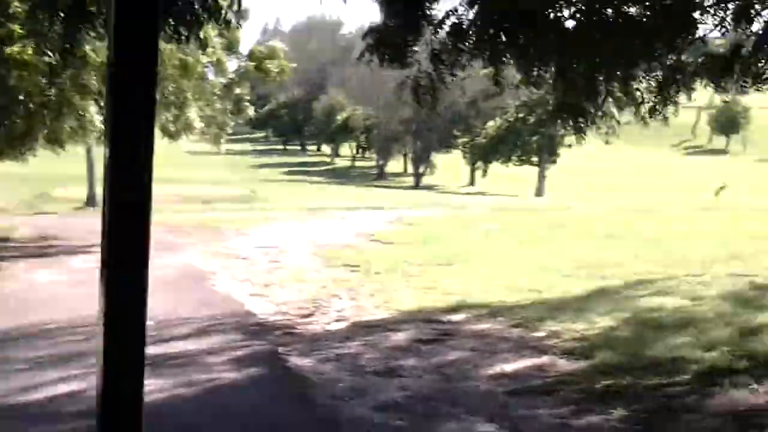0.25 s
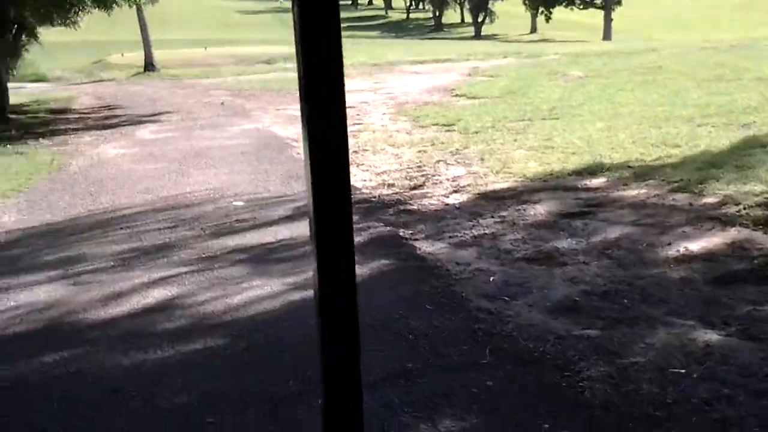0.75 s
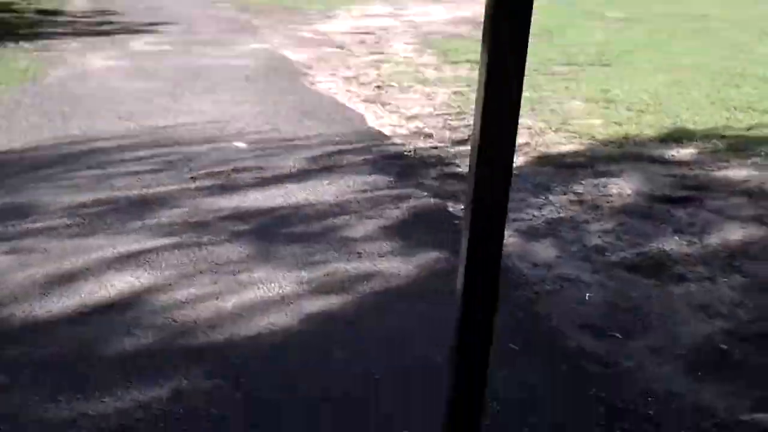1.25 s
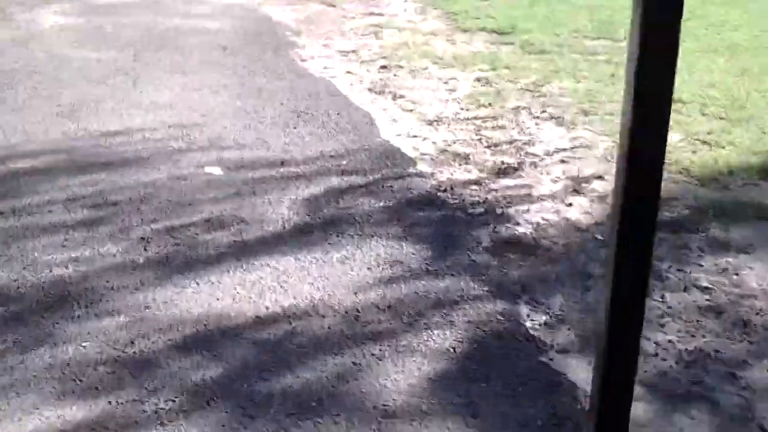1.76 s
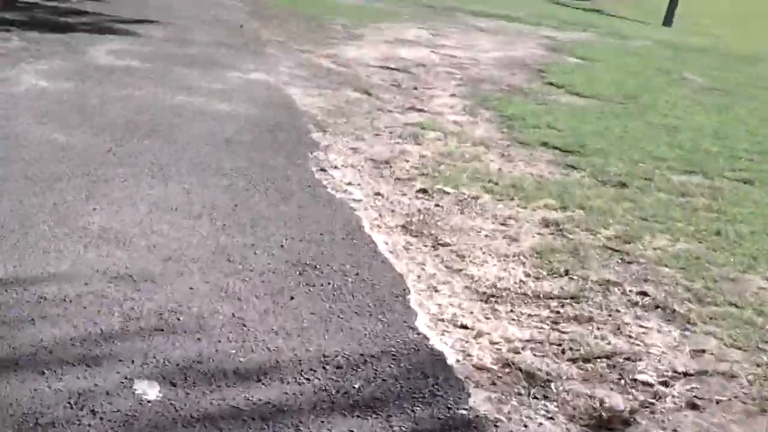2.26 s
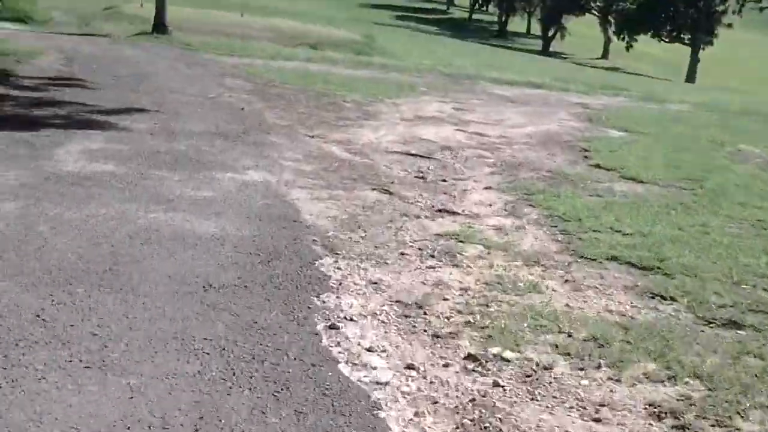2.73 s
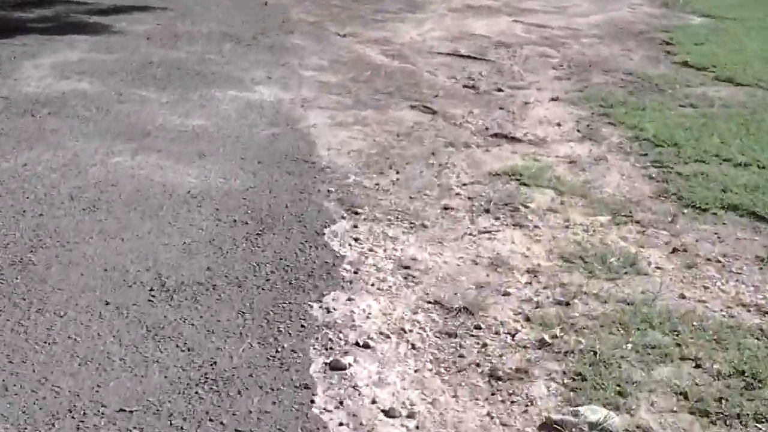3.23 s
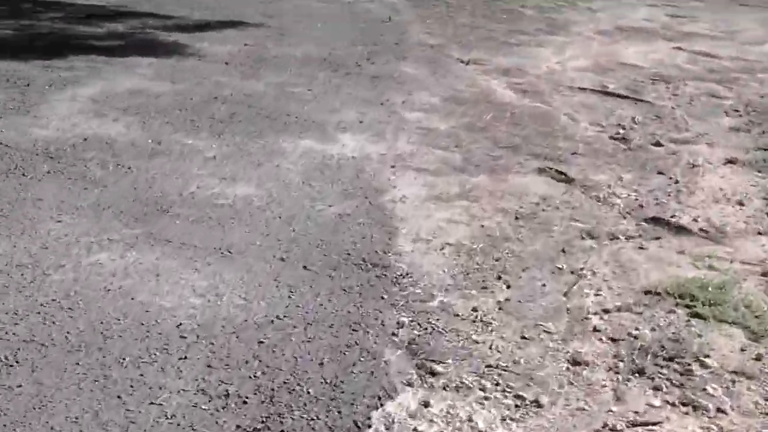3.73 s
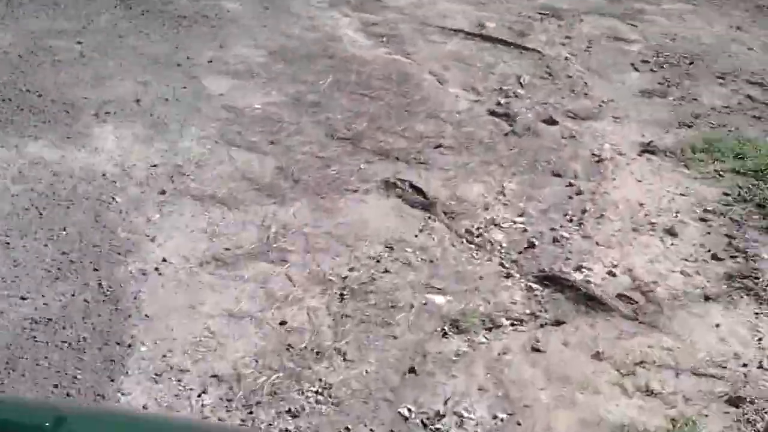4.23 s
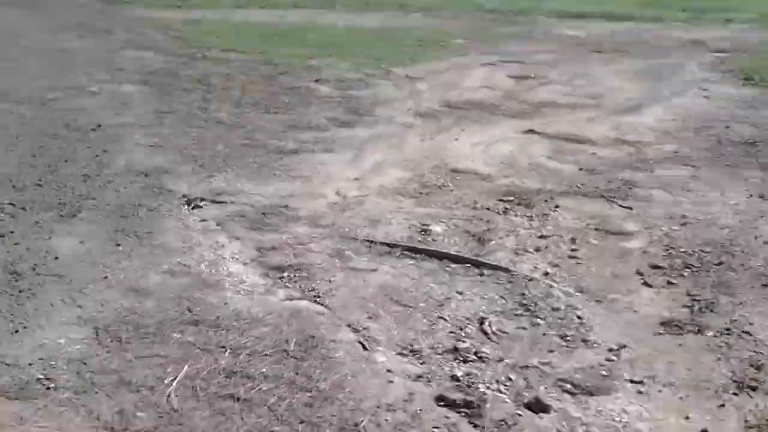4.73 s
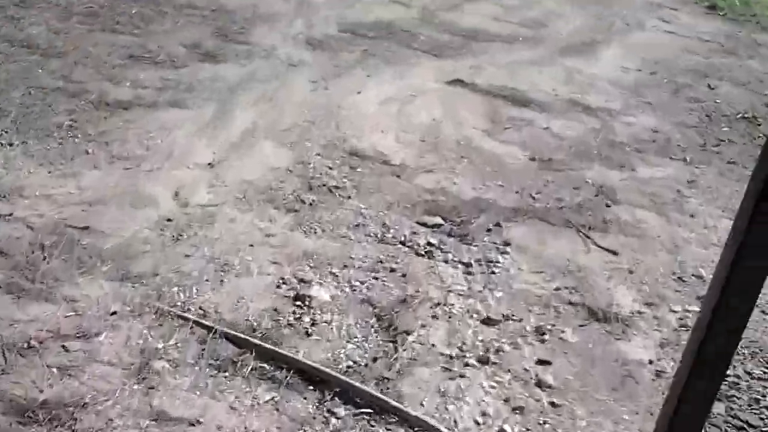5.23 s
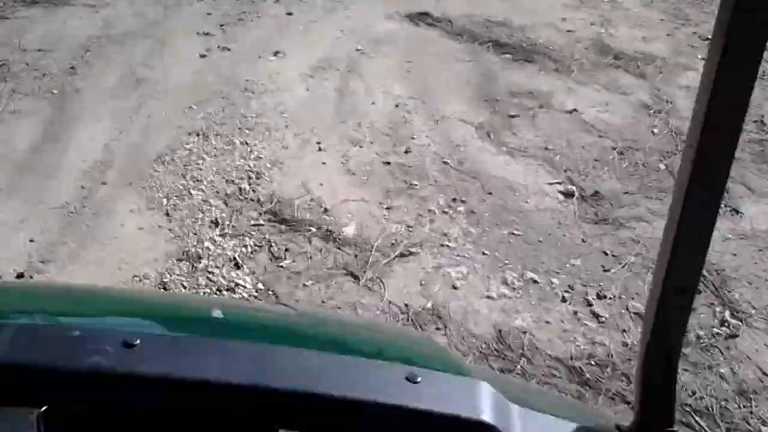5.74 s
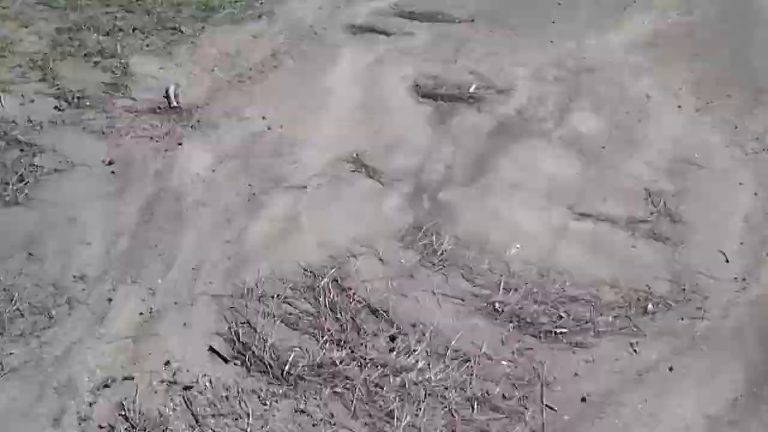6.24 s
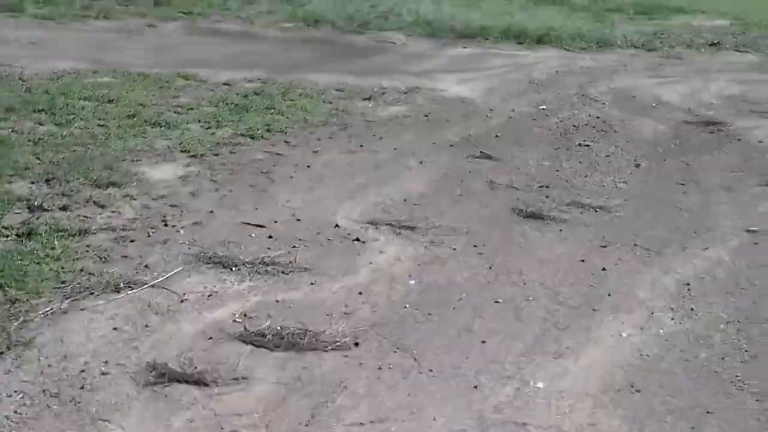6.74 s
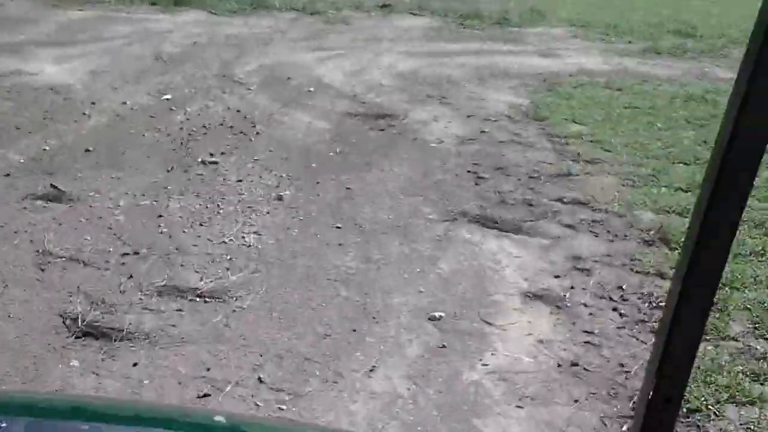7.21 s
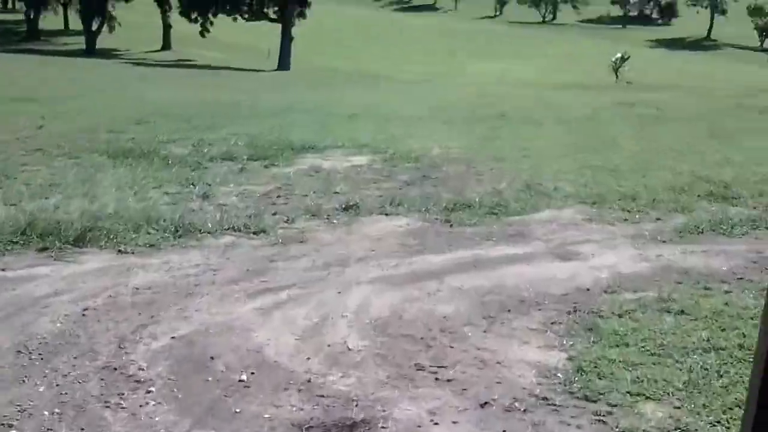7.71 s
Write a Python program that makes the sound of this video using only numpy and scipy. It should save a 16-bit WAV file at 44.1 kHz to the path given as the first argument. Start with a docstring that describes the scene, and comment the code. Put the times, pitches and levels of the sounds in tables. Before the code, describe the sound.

An electric golf cart is already moving, heard close up from the seat under its roof. Throughout, the gears whine with a gently shifting pitch, a shaft rubs with a fast pulsing hiss, and the tyres roar and drum through the body. From about 1.3 to 2.3 seconds, bumps knock the plastic shell and thud the suspension, hardest near 1.8. The whine dips as the cart slows slightly around 3 seconds, then climbs again. From 3.4 seconds gravel crunches and small stones snap under the tyres. Between roughly 4.9 and 6.5 seconds, ruts bring a busy run of hollow knocks and clanking steel fittings, with the biggest blow near 5.75 briefly overloading the microphone. Around 7 seconds a bird gives three very faint, high, falling whistles. A last group of knocks, a light clank and more gravel arrive from 7.6 to 8 seconds as the cart drives on.

```python
"""An electric golf cart rolls from asphalt onto a rutted dirt track, heard from the seat.
From the start the gears whine, a shaft rubs once a turn and the tyres drum through the body.
Near 2 s bumps knock the plastic shell and the suspension thuds; then asphalt gives way to dirt,
with gravel crunching and stones snapping. From 5 s ruts also clank loose steel fittings, and the
hardest blows overload the microphone. Near 7 s a bird whistles faintly, before the last bumps."""
import sys
import numpy as np
from scipy import signal
from scipy.fft import rfft, irfft, next_fast_len
from scipy.io import wavfile
from scipy.ndimage import uniform_filter1d, map_coordinates

SR = 44100
rng = np.random.default_rng(int(sys.argv[2]) if len(sys.argv) > 2 else 0)


def to_wav(sig):
    """Store sig (one row per channel, or 1-D mono) as 16-bit WAV at the path in sys.argv[1].

    Samples outside -1..1 are clipped; the rate is SR.
    """
    pcm = np.clip(np.atleast_2d(sig), -1, 1) * 32767
    pcm = np.round(pcm).astype(np.int16)
    wavfile.write(sys.argv[1], SR, pcm.T)  # frames by channels


N = 351477

# Shaft speed. Each row: time in seconds, turns per second.
SHAFT_SPEED = [(0, 16.89), (0.5, 17.3), (1.4, 20.31), (1.9, 19.56), (2.9, 15.91), (3.5, 15.7), (4.2, 17.64),
               (4.9, 18.27), (5.4, 19.46), (5.8, 17.29), (6.2, 19.44), (6.6, 18.72), (7.97, 18.51)]
# Gear whine. Each row: time in seconds, pitch in Hz, level in dB.
GEAR_WHINE = [(0.4, 1305, -41), (.72, 1340, -35), (.92, 1350, -34), (1.01, 1360, -25), (1.22, 1374, -31),
              (1.5, 1440, -29.5), (1.78, 1469, -27.5), (2.15, 1430, -31.5), (2.35, 1382, -26.5),
              (2.65, 1317, -38), (2.85, 1295, -28.5), (3.2, 1280, -46), (3.5, 1290, -41),
              (3.68, 1305, -32.5), (4.62, 1357, -37), (4.85, 1430, -41), (5.25, 1495, -32),
              (5.9, 1470, -38), (6.3, 1480, -31.5), (6.6, 1470, -40), (6.9, 1475, -33), (7.25, 1465, -30),
              (7.97, 1461, -29)]
# Spread of the whine. Each row: pitch in Hz, share of power in sidebands from 0 to 1.
SIDEBAND_SHARE = [(1340, .06), (1400, .22), (1455, .88)]
# Whines locked to the shaft. Each row: cycles per turn, level in dB, roughness from 0 to 1.
UPPER_WHINES = [(162.2, -47, 0.6), (185, -51.5, 0.3)]
# Motor hum. Each row: time in seconds, level in dB.
MOTOR_HUM = [(0, -38), (1.1, -37.5), (1.45, -27.5), (1.9, -43.5), (7.97, -37.5)]
# Ground under the tyres. Each row: time in seconds, coarseness in dB.
GROUND = [(0.0, -29), (.8, -27.5), (1.15, -25), (1.62, -24), (1.75, -26), (2.15, -24.5), (2.64, -27.5),
          (3.4, -28.5), (3.82, -24), (5.35, -24.5), (5.52, -22), (6.11, -23.5), (6.75, -29.5), (7.41, -29),
          (7.97, -26)]
# Rolling sounds by name. Each row: level in dB at cruise on smooth dirt, dB per dB of coarseness,
# dB per extra turn per second, offset in dB on asphalt.
RIDE_RESPONSE = {"roar": (-27.5, 1, 0, -0.23), "hiss": (-28.5, 0.34, 0.69, 1.06),
                 "boom": (-35.5, 1.06, 2.1, -2.5), "drone": (-32, 0.89, 1.4, -10)}
# Tread roar. Each row: frequency in Hz, density in dB.
ROAR_SPECTRUM = [(20, -33), (50, -36.5), (90, -16), (150, -8.5), (290, -5.5), (350, -0.5), (490, 3),
                 (610, 0.5), (700, -4.5), (850, -2.5), (1000, -8.5), (1200, -7.5), (1800, -19), (5000, -75)]
# Bumps and ruts. Each row: middle in seconds, length in seconds, level in dB.
BUMPS = [(1.422, .11, -28), (1.766, 0.099, -23), (2.045, 0.034, -23), (2.218, 0.088, -23),
         (3.627, 0.044, -40), (4.922, .06, -17.5), (5.071, 0.077, -21), (5.369, 0.11, -20),
         (5.578, .05, -20.5), (5.724, 0.068, -19), (5.956, 0.044, -23), (6.337, 0.11, -25),
         (6.819, 0.039, -30), (7.116, 0.05, -30.5), (7.67, 0.08, -23), (7.831, 0.11, -17.5)]
# Seat well and roof resonances. Each row: frequency in Hz, nominal width in Hz, gain in dB.
CAVITY_MODES = [(183, 24.6, 1), (261.4, 59, 1), (359.6, 37, -1.5)]
# Blows on the shell. Each row: start in seconds, level in dB, nominal pitch in Hz, rise in seconds.
SHELL_KNOCKS = [(1.303, -7.5, 720, 0.0019), (1.402, -8, 504, .002),  (1.471, -5, 530, .0028),
                (1.699, -4, 560, 0.0018), (1.718, -3, 607, 0.0013), (1.724, -5, 433, 0.0038),
                (1.749, -4.5, 497, 0.00387), (1.76, 5.5, 622, 0.0023), (1.7663, 4.5, 556, 0.0039),
                (1.784, -5.5, 505, 0.0027), (1.802, -5, 475, .0028), (1.811, -1, 800, 0.0018),
                (1.818, -4, 390, 0.0021), (2.0181, -0.5, 547, 0.0021), (2.0332, -11, 490, 0.0013),
                (2.07, 1.5, 408, 0.002), (2.1063, -7, 775, 0.0015), (2.1099, -2, 397, 0.0033),
                (2.209, -8.5, 345, .0027), (2.2257, -14.5, 353, 0.0013), (2.2469, -8, 530, .0023),
                (2.584, -16, 946, 0.00354), (3.622, -8, 554, 0.0035), (4.587, -11, 520, 0.0048),
                (4.902, -5, 450, 0.0014), (4.921, -7, 437, 0.00405), (4.962, -3, 490, 0.0014),
                (5.0534, -3.5, 390, 0.0028), (5.0622, -6.5, 490, 0.0022), (5.312, -9.5, 473, 0.0031),
                (5.391, -6.5, 455, 0.0037), (5.572, -8, 450, 0.0051), (5.6972, -2, 466, 0.00076),
                (5.715, -5, 487, .002), (5.7208, -5, 305, 0.003), (5.732, -3.5, 330, .002),
                (5.7358, 0.5, 1000, 0.0011), (5.743, -8, 330, 0.0022), (5.753, 4.5, 764, 0.0034),
                (5.762, 4.5, 514, 0.00346), (5.931, 0, 387, .0022), (5.9413, -4, 430, 0.0026),
                (6.305, -7.5, 386, 0.0031), (6.3375, -9, 444, 0.003), (6.372, -6, 412, 0.002),
                (7.118, -18, 940, 0.0034), (7.6311, -8.5, 530, 0.0015), (7.6775, -4.5, 310, 0.00285),
                (7.7154, -5, 650, .0014), (7.723, -4.5, 427, .0022), (7.807, -4.5, 415, 0.0029),
                (7.825, -3, 259, 0.0031), (7.8333, -10, 380, 0.0013), (7.859, -7, 440, 0.0036)]
# Shell resonances. Each row: frequency in Hz, nominal width in Hz, gain in dB.
SHELL_MODES = [(209, 26, 6), (279, 65, 10), (490, 58, 1), (588, 140, -1), (750, 37, 1), (1047, 21, -9)]
# Loose fittings. Each row: start in seconds, level in dB, bass and treble trims in dB, clack in Hz.
FITTING_CLANKS = [(4.9411, -7, 2.5, -24, 3900), (5.1055, -4.5, 1, -24, 2060), (5.376, -7, 4.5, -1, 4660),
                  (5.462, -13, -16, -15, 2630), (5.566, -10, -1, -1, 3870), (5.677, -15.5, -2, 4.5, 4450),
                  (5.753, -8, 17, -15, 2090), (6.1405, -3.5, 2, -3.5, 3920),
                  (6.4949, -10.5, 6.5, -8.5, 4050), (7.1395, -30, 4, 5, 2290),
                  (7.683, -16.5, -12, -1, 3000)]
# Fitting resonances. Each row: frequency in Hz, gain in dB, T60 in seconds.
FITTING_MODES = [(761, -5, .076), (1010, 0, .055), (2860, -5, .055), (3430, -8, .024), (4130, -7, .06),
                 (5200, -12, .15), (6520, -14.5, .045)]
# Suspension jolts. Each row: start in seconds, level in dB, nominal pitch in Hz.
SUSPENSION_THUDS = [(.135, -23.5, 258), (1.155, -29, 215), (1.468, -10, 280), (2.075, -21, 215),
                    (2.941, -30, 205), (3.645, -28, 225), (4.596, -21, 190), (6.03, -23, 196),
                    (6.186, -26, 227), (7.828, -28, 235)]
# Unevenness of the rub. Each row: time in seconds, nominal swing per turn in dB.
RUB_SWING = [(0, 1.5), (.8, .5), (1.5, .9), (1.9, 2.3), (2.45, 3.1), (3.05, 3.1), (4.2, 1.8), (6.2, 1.1),
             (6.5, 2.0), (7.05, 2.4), (7.97, 1.6)]
# Rub and gravel noise. Each row: frequency in Hz, density in dB.
HISS_SPECTRUM = [(100, -50), (700, -1), (1500, 0), (1850, -2), (2400, 1.6), (2900, -0.1), (3400, -1),
                 (4300, -2.5), (4850, -4), (5300, -5), (5900, -13.5), (6700, -17), (7900, -18),
                 (9700, -30.5), (15000, -88)]
# Steel frame resonances. Each row: frequency in Hz, half-width in Hz, gain in dB.
FRAME_MODES = [(2330, 33, -11.5), (2890, 120, -0.5), (5260, 46, -1.5)]
# Loose gravel. Each row: middle in seconds, length in seconds, level in dB.
GRAVEL_PATCHES = [(1.32, 0.14, -24.5), (1.5, 0.16, -26.5), (2.23, 0.16, -28.5), (3.456, 0.061, -29),
                  (3.67, 0.14, -29), (3.85, 0.12, -28), (4.165, 0.093, -25), (4.61, 0.071, -26.5),
                  (4.9, 0.07, -24), (5.344, 0.14, -27.5), (7.8, 0.29, -26.5)]
# Stones pinched by a tyre. Each row: start in seconds, level in dB, pitch in Hz.
STONE_SNAPS = [(3.4155, -18, 2900), (3.4584, -22, 4200), (3.5073, -19, 2920), (3.7083, -16, 3330),
               (3.8107, -16, 2000), (4.126, -13.5, 3580), (4.22, -18, 3980), (4.852, -19, 4060),
               (5.691, -8.5, 2450), (5.783, -13, 3580), (5.791, -15, 3670)]
# Bird whistles. Each row: start in seconds, level in dB.
BIRD_WHISTLES = [(6.924, -40), (7.125, -41), (7.315, -48)]


def drive():
    """Gears whine over the motor's hum; a housing resonance lifts faint upper whines as they pass."""
    hz, db = curves(GEAR_WHINE)
    share = np.interp(hz, *np.transpose(SIDEBAND_SHARE))
    gears = amp(db) * (np.sqrt(1 - share) * tone(hz, rough=0.33) + np.sqrt(share) * sidebands(hz))
    turns_per_s, = curves(SHAFT_SPEED)
    housing_hz, half_width_hz = 3150, 110
    for cycles, upper_db, rough in UPPER_WHINES:
        upper_hz = cycles * turns_per_s
        lift = 1 + 1.5 / (1 + ((upper_hz - housing_hz) / half_width_hz) ** 2)
        gears += amp(upper_db) * lift * tone(upper_hz, rough)
    hum = tone(hz=822, rough=1) + amp(-4.5) * tone(hz=1075, rough=0.55)
    return gears + amp(curves(MOTOR_HUM)[0]) * hum


def tone(hz, rough):
    """A line at hz, smeared by uneven running; rough is the smeared share of power."""
    phase = 2 * np.pi * np.cumsum(hz * (1 + 0.00295 * wobble(30))) / SR
    flutter = lambda: wobble(60) + wobble(170)
    smear = unit(flutter() * np.sin(phase) + flutter() * np.cos(phase))
    clean = unit(np.sin(phase) * amp(1.1 * wobble(14)))
    return np.sqrt(1 - rough) * clean + np.sqrt(rough) * smear


def sidebands(hz, reach_lines=3.3):
    """Uneven gear teeth put wavering lines on both sides of hz, spaced by the shaft rate."""
    mesh_rad = 2 * np.pi * np.cumsum(hz) / SR
    shaft_rad = 2 * np.pi * np.cumsum(curves(SHAFT_SPEED)[0]) / SR
    lines = np.zeros(N)
    for k in range(-8, 9):
        if k:
            phase = mesh_rad + k * shaft_rad + 2 * np.pi * rng.random() + 1.5 * wobble(18)
            lines += np.exp(-abs(k) / reach_lines) * np.sin(phase)
    return unit(lines)


def tyres():
    """The tread roars; stones and bumps keep the hollow body booming and a panel droning."""
    roar_gain = ride_gain("roar") * amp(1.4 * wobble(24))
    roar = roar_gain * coloured(patchy(rng.standard_normal(N), depth_db=1.8), ROAR_SPECTRUM)
    jolts = rng.standard_normal(N) * amp(3.6 * wobble(14)) + 0.5 * grains(per_s=60, spread_db=1)
    bumps = swells(BUMPS)
    boom = np.hypot(ride_gain("boom"), amp(1) * bumps) * unit(shell(jolts, CAVITY_MODES))
    panel_hz, width_hz = 390, 55
    panel = [(panel_hz, width_hz, 0)]
    panel_ring = unit(shell(shell(rng.standard_normal(N), panel), panel))
    drone = np.hypot(ride_gain("drone"), amp(-1) * bumps) * panel_ring
    return roar + boom + drone


def ride_gain(sound, smooth_db=-28, cruise_turns_per_s=18, dirt_from_s=2.2, dirt_full_s=5.6):
    """A rolling sound follows ground coarseness, speed and surface."""
    db, by_ground, by_speed, asphalt_db = RIDE_RESPONSE[sound]
    asphalt = np.interp(np.arange(N) / SR, [dirt_from_s, dirt_full_s], [1, 0])
    coarse_db = curves(GROUND)[0] - smooth_db
    extra_turns_per_s = curves(SHAFT_SPEED)[0] - cruise_turns_per_s
    return amp(db + by_ground * coarse_db + by_speed * extra_turns_per_s + asphalt_db * asphalt)


def knocks(lead_s=0.005):
    """Each blow cracks on contact, swings a panel, shakes the shell and thumps the hollow body."""
    panels, shakes, t = np.zeros(N), np.zeros(N), np.arange(SR // 6) / SR
    judder = amp(-60 * np.maximum((lead_s - t) / 0.02, (t - lead_s) / 0.062))
    for s, db, hz, rise_s in SHELL_KNOCKS + rattles():
        push = (t / rise_s) ** 2 * np.exp(2 - 2 * t / rise_s)
        glide_hz = hz * (0.694 + 0.7 * np.exp(-t / rise_s))  # short bending waves arrive first
        swing = push * sine(glide_hz)
        thump_hz = 215 * rng.uniform(0.65, 1)
        thump = np.sin(2 * np.pi * thump_hz * t) * amp(-60 * t / 0.027) * (1 - np.exp(-t / 0.0094))
        add(panels, s, amp(db - 1) * swing + amp(db - 15) * thump)
        crack = burst(t, hz=1035, spread=0.35, t60_s=0.012)
        add(panels, s + rise_s / 2, amp(db - 11.5) * crack)
        add(shakes, s + rise_s - lead_s, amp(db) * rng.standard_normal(len(t)) * judder)
    return drop_bass(panels) + shell(shakes, SHELL_MODES)


def rattles(per_s=30, centre_hz=428, scatter_db=4.5, rise_s=0.00176):
    """Lesser knocks scattered through each bump, as rows like SHELL_KNOCKS."""
    rows = []
    for middle_s, length_s, db in BUMPS:
        count = int(np.clip(round(per_s * length_s), 1, 5))
        slip, strength, pitch = np.clip(rng.standard_normal((3, 5)), -1.5, 1.5)[:, :count]
        place = (np.arange(count) + 0.5 + slip / np.pi) / count - 0.5
        starts_s = middle_s + length_s * place
        levels_db = db + 4 + scatter_db * strength
        rows += zip(starts_s, levels_db, centre_hz * np.exp(0.19 * pitch), [rise_s] * count)
    return rows


def clanks(gap_s=0.0063, lag_s=0.0017, low_hz=1500, high_hz=5800):
    """A fitting bounces; each of three contacts clacks, ticks, raps its mount and rings the steel."""
    steel, cracks, t = np.zeros(N), np.zeros(N), np.arange(SR // 5) / SR
    hz, mode_db, t60_s = np.transpose(FITTING_MODES)[:, :, None]
    late = 1 - np.exp(-(t / lag_s) ** 2)  # slow bending waves arrive after the clack
    attack = 1 - np.exp(-t / 0.00084)
    for s, db, bass_db, treble_db, clack_hz in FITTING_CLANKS:
        colour = np.where(hz < low_hz, amp(bass_db) * late, 1)
        colour *= np.where(hz > high_hz, amp(treble_db / 3 + 3), 1)
        mount_hz = hz * np.where(hz < low_hz, rng.uniform(0.91, 1.06, hz.shape), 1)
        for bounce in range(3):
            at_s = s + bounce * gap_s * rng.uniform(0.48, 1.4)
            gain = amp(db - 2.9 * bounce)
            decay = colour * amp(mode_db + rng.normal(0, 1.2, hz.shape) - 60 * t / t60_s)
            ring_hz = mount_hz * (1 + rng.normal(0, 0.005, hz.shape))
            ring = (decay * np.sin(2 * np.pi * (ring_hz * t + rng.random(hz.shape)))).sum(0)
            clack = amp(-9) * burst(t, clack_hz, spread=0.12, t60_s=0.044)
            rap = amp(bass_db - 11.5) * late * burst(t, hz=854, spread=0.39, t60_s=0.053)
            tick = amp(treble_db - 19.5) * burst(t, hz=9000, spread=0.33, t60_s=0.018)
            add(steel, at_s, gain * ((amp(-7.5) * ring + clack + rap) * attack + tick))
            crack = rng.standard_normal(len(t)) * amp(-60 * t / 0.013)
            add(cracks, at_s, gain * amp(treble_db / 2 + 4 - 3 * bounce) * crack)
    band = signal.butter(4, [low_hz, high_hz], "bandpass", fs=SR, output="sos")
    return steel + signal.sosfilt(band, cracks)


def shaft_rub(grit=0.22, frame_db=-11.5):
    """A rubbing shaft hisses, swelling once a turn, and rings the steel frame."""
    turns = np.cumsum(curves(SHAFT_SPEED)[0]) / SR + 0.14
    angle = 2 * np.pi * turns
    swing_db = curves(RUB_SWING)[0] * (1 + 0.12 * wobble(12))  # no two turns rub alike
    throb = amp(swing_db * (np.cos(angle) + 0.2 * np.cos(2 * angle)) + 0.55 * wobble(45))
    texture = rng.standard_normal(N) + grit * grains(per_s=1000, spread_db=-4.5)
    hiss = unit(throb * coloured(texture, HISS_SPECTRUM))
    frame = lambda f: sum(amp(db) / (1 + ((f - hz) / half_hz) ** 2) for hz, half_hz, db in FRAME_MODES)
    ring = unit(throb ** 2 * filtered(rng.standard_normal(N), frame))
    return ride_gain("hiss") * (hiss + amp(frame_db) * ring)


def suspension(rise_s=0.0079):
    """The springs take a jolt and the hollow body swings a few soft cycles."""
    body, t = np.zeros(N), np.arange(SR // 6) / SR
    swell = t / rise_s * np.exp(1 - t / rise_s)
    for s, db, hz in SUSPENSION_THUDS:
        glide_hz = hz * (0.85 + 0.3 * np.exp(-t / (2 * rise_s)))
        add(body, s, amp(db) * swell * sine(glide_hz))
    return body


def gravel():
    """Dense stone clicks swell and fade as a tyre crosses a loose patch."""
    return swells(GRAVEL_PATCHES) * coloured(grains(per_s=1100, spread_db=5), HISS_SPECTRUM)


def stones(attack_s=0.0007):
    """A pinched stone lets go with one dry snap."""
    snaps, t = np.zeros(N), np.arange(SR // 10) / SR
    attack = 1 - np.exp(-t / attack_s)
    for s, db, hz in STONE_SNAPS:
        add(snaps, s, amp(db - 1.5) * burst(t, hz, spread=0.31, t60_s=0.038) * attack)
    return snaps


def bird(length_s=0.08, start_hz=8800, end_hz=5140):
    """Thin whistles slide down ever faster."""
    song, progress = np.zeros(N), np.linspace(0, 1, int(length_s * SR))
    hz = start_hz + (end_hz - start_hz) * progress ** 1.2
    envelope = np.sqrt(np.abs(np.sin(np.pi * progress ** 1.76)))
    for s, db in BIRD_WHISTLES:
        add(song, s, amp(db) * envelope * sine(hz))
    return song


def shell(x, modes, min_width_hz=38, rolloff_hz=3500):
    """Damped plastic panels ring, passing neither deep bass nor high treble."""
    def response(f):
        ring = sum(amp(db) / (1 + 1j * (f * f - hz * hz) / (f * max(width_hz, min_width_hz) + 1))
                   for hz, width_hz, db in modes)
        return ring / (1 + 1j * f / rolloff_hz) ** 3
    return drop_bass(filtered(x, response))


def drop_bass(x, cutoff_hz=115):
    """Deep bass is taken away below the cut-off."""
    return signal.sosfilt(signal.butter(3, cutoff_hz, "highpass", fs=SR, output="sos"), x)


def canopy(x):
    """Roof and dash return five weak, early echoes."""
    taps = np.zeros(SR // 40)
    taps[0] = 1
    taps[rng.integers(SR // 400, SR // 100, size=5)] = 0.11 * rng.choice([-1, 1], size=5)
    return signal.fftconvolve(x, taps / np.linalg.norm(taps))[:N]


def burst(t, hz, spread, t60_s):
    """A noise band around hz that rises within a cycle and dies away."""
    edges_hz = hz * np.exp([-spread, spread])
    band = signal.butter(3, edges_hz, "bandpass", fs=SR, output="sos")
    noise = unit(signal.sosfilt(band, rng.standard_normal(2 * len(t)))[len(t):])
    rise = (1 - np.exp(-np.pi * hz * t)) ** 2
    return rise * noise * amp(-60 * t / t60_s)


def patchy(x, depth_db):
    """x with colours that come and go, each some 150 Hz wide and 150 ms long."""
    bins = signal.stft(x, nperseg=1024)[2]
    field = uniform_filter1d(rng.standard_normal(bins.shape), 4, axis=0)
    field = unit(uniform_filter1d(field, 13, axis=1))
    return unit(signal.istft(bins * amp(depth_db * field), nperseg=1024)[1][:N])


def grains(per_s, spread_db):
    """Random impulses of uneven size, at rms 1."""
    impulses = (rng.random(N) < per_s / SR) * rng.choice([-1, 1], N)
    return unit(impulses * amp(spread_db * rng.standard_normal(N)))


def swells(rows):
    """A gain that rises and falls around each row's middle."""
    gain = np.zeros(N)
    for middle_s, length_s, db in rows:
        add(gain, max(middle_s - length_s, 0), amp(db) * np.hanning(int(2 * length_s * SR)))
    return gain


def wobble(knots_per_s):
    """A smooth random curve."""
    knots = rng.standard_normal(int(N * knots_per_s / SR) + 4)
    return map_coordinates(knots, [np.arange(N) * knots_per_s / SR])


def curves(rows):
    """One value per sample for each column after the time."""
    s, *columns = np.transpose(rows)
    return [np.interp(np.arange(N) / SR, s, column) for column in columns]


def coloured(x, spectrum):
    """x shaped by a spectrum on a log frequency axis, at rms 1."""
    hz, db = np.transpose(spectrum)
    return unit(filtered(x, lambda f: amp(np.interp(np.log(f + 1), np.log(hz), db))))


def filtered(x, response):
    """x through a complex frequency response."""
    size = next_fast_len(N + SR // 2)
    return irfft(rfft(x, size) * response(np.fft.rfftfreq(size, 1 / SR)), size)[:N]


def sine(hz):
    """A sine that follows a pitch curve."""
    return np.sin(2 * np.pi * np.cumsum(hz) / SR)


def add(track, s, sound):
    """Mix a sound into the track at s seconds."""
    part = track[round(s * SR):][:len(sound)]
    part += sound[:len(part)]


def amp(db):
    """Decibels to gain."""
    return 10 ** (np.asarray(db) / 20)


def unit(x):
    """Scale to rms 1."""
    return x / np.sqrt(np.mean(x ** 2) + 1e-20)


def scene():
    """Everything reaches one microphone under the roof."""
    mono = drive() + canopy(shaft_rub() + gravel() + stones())
    mono += tyres() + suspension() + knocks() + clanks() + bird()
    return np.array([mono, mono])


def record(dry):
    """The hardest blows clip; the top treble is cut."""
    return np.array([filtered(channel, lambda hz: hz < 15700) for channel in np.clip(dry, -1, 1)])


dry = scene()
out = record(dry)
to_wav(out)
```